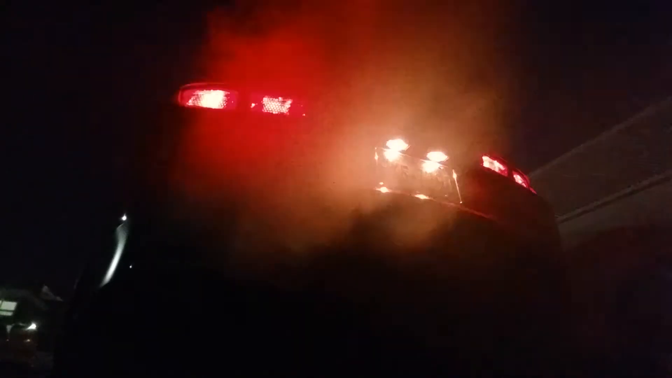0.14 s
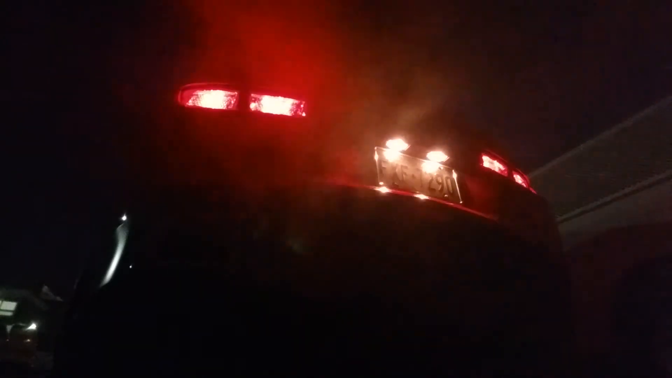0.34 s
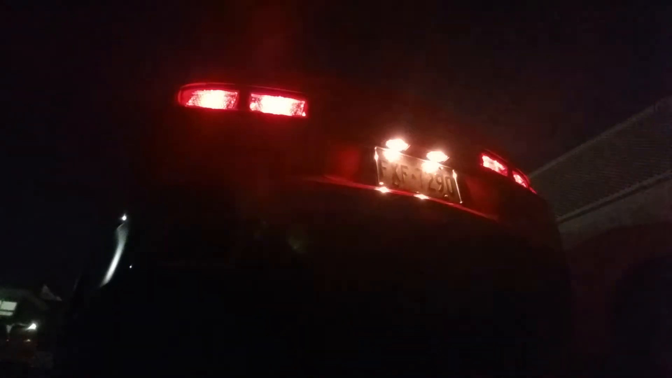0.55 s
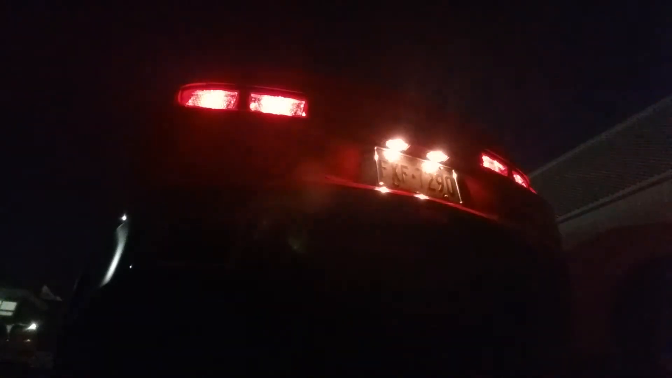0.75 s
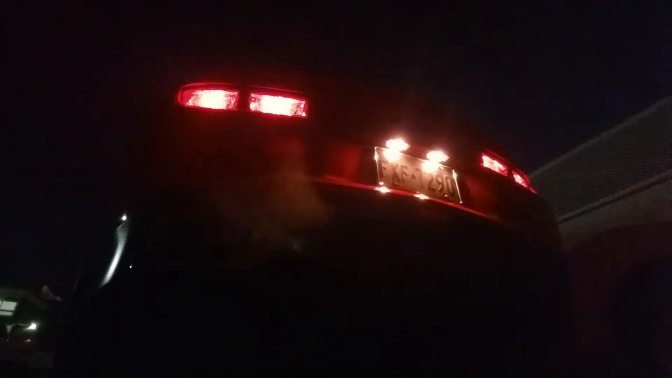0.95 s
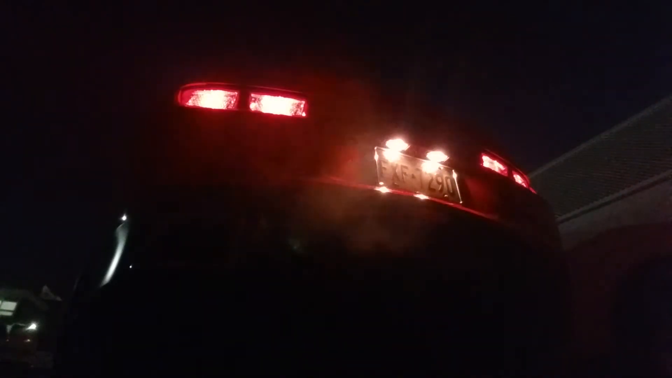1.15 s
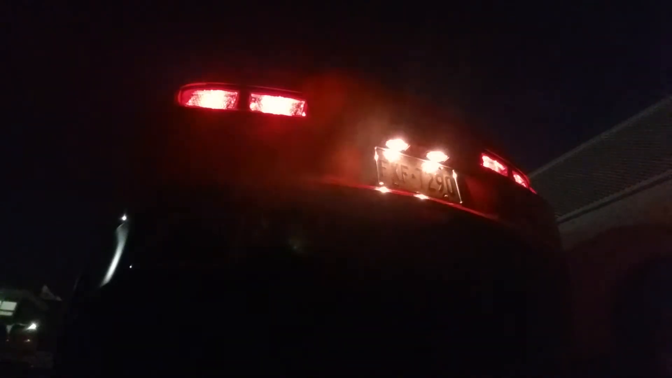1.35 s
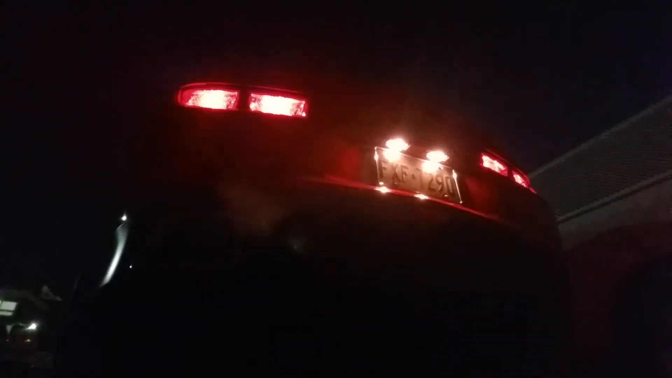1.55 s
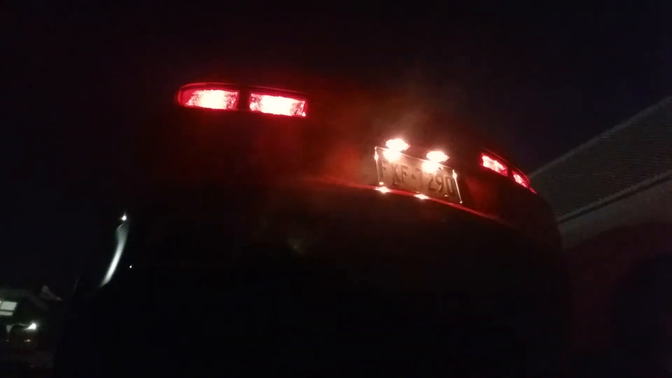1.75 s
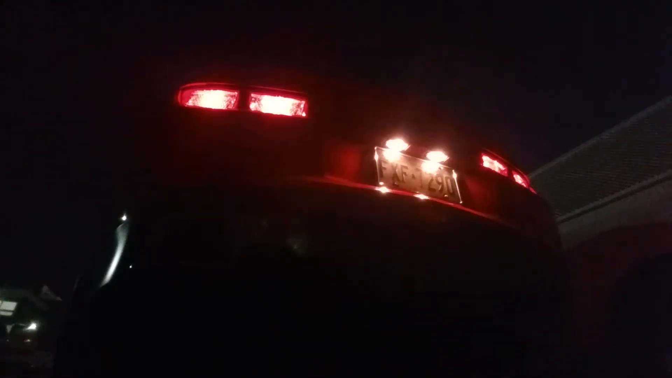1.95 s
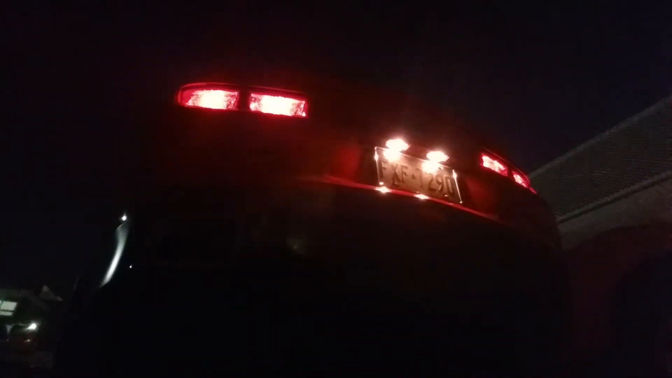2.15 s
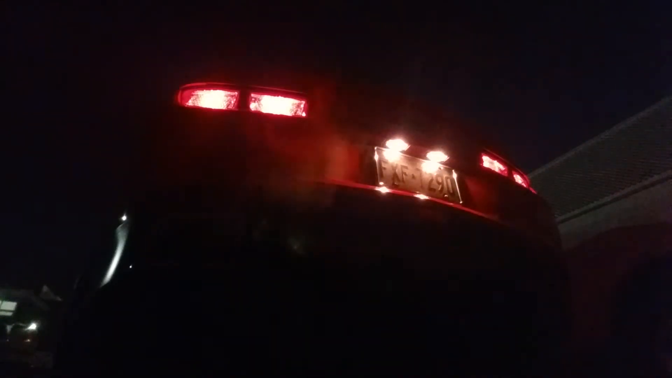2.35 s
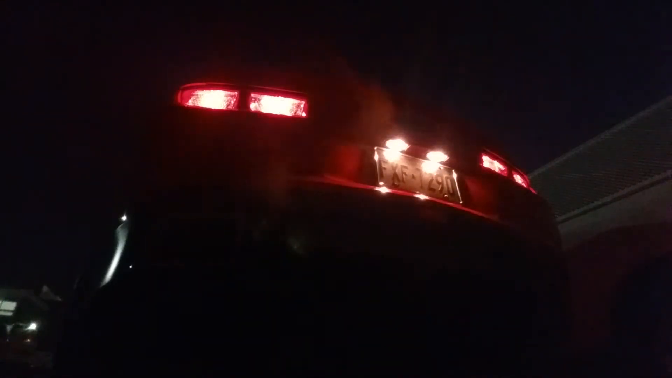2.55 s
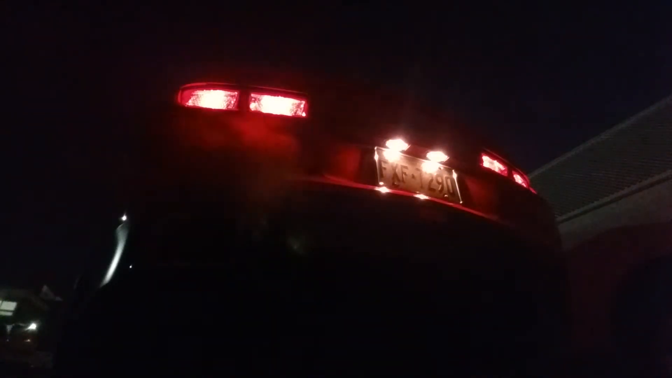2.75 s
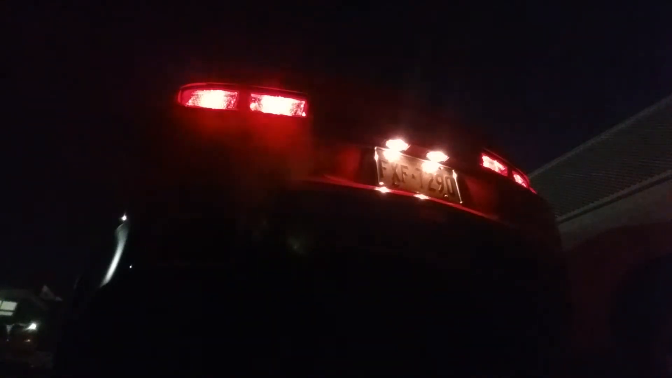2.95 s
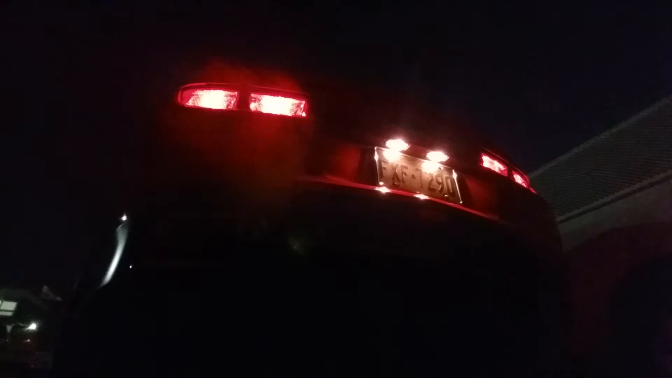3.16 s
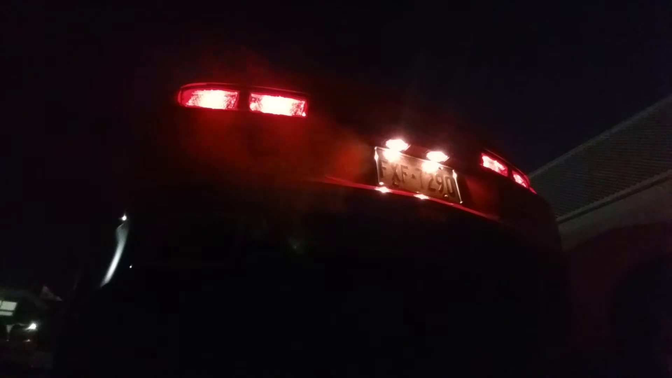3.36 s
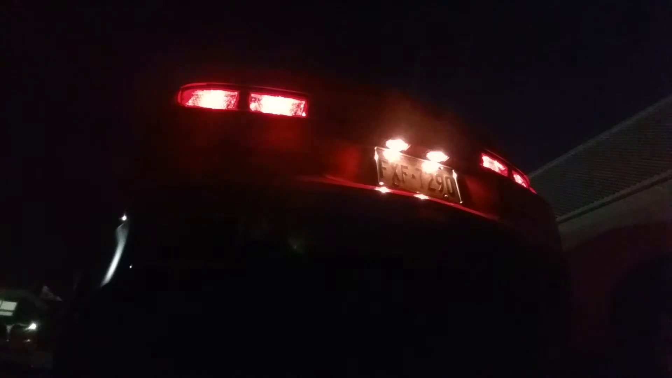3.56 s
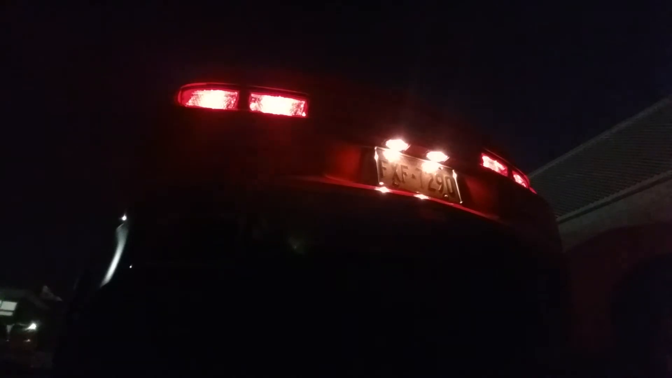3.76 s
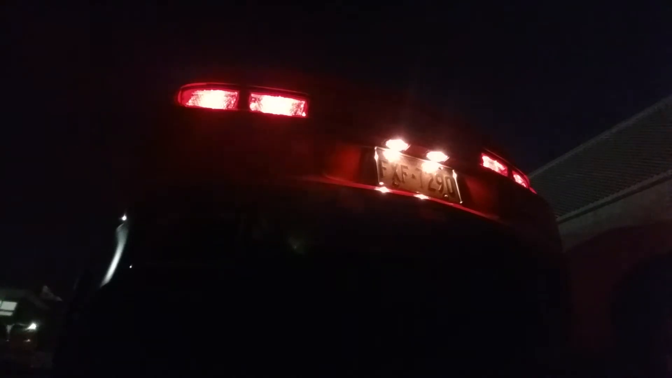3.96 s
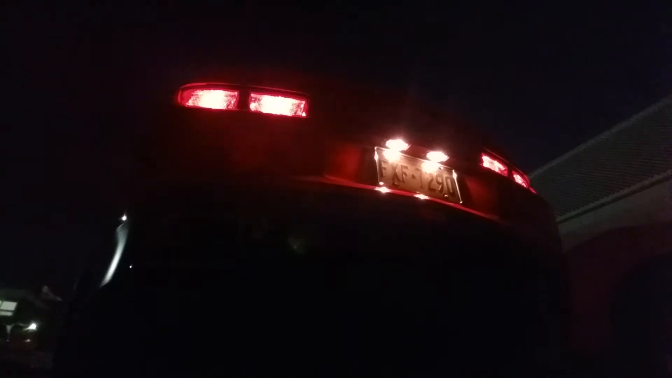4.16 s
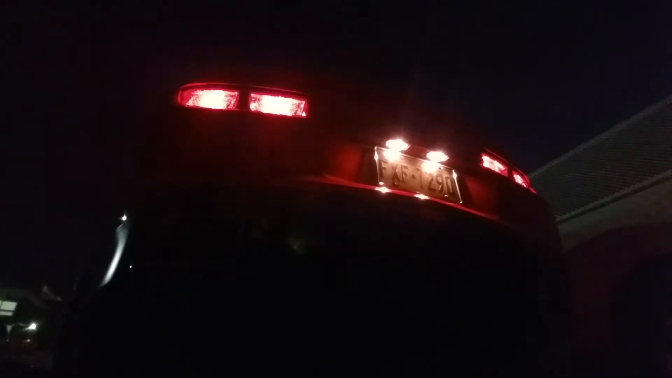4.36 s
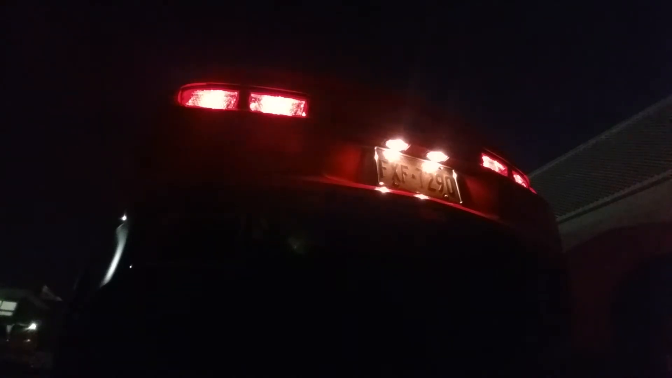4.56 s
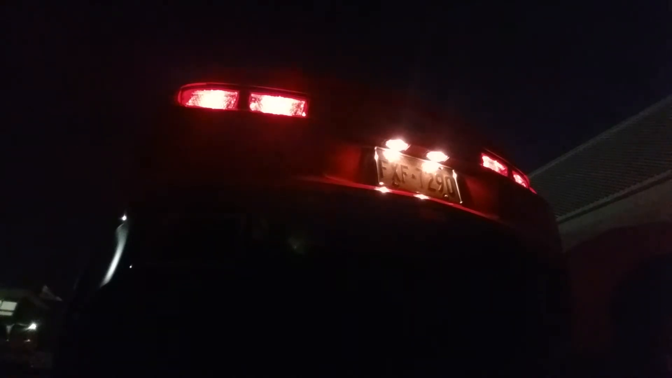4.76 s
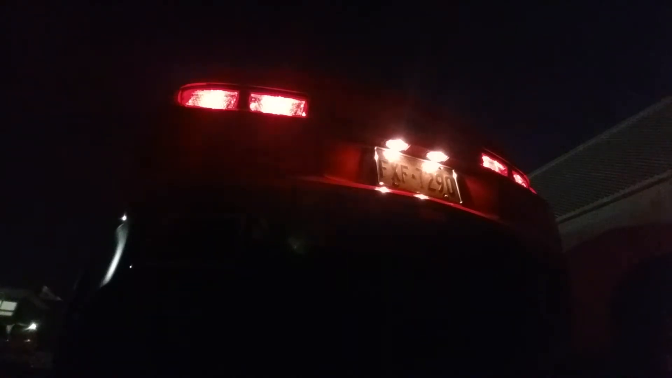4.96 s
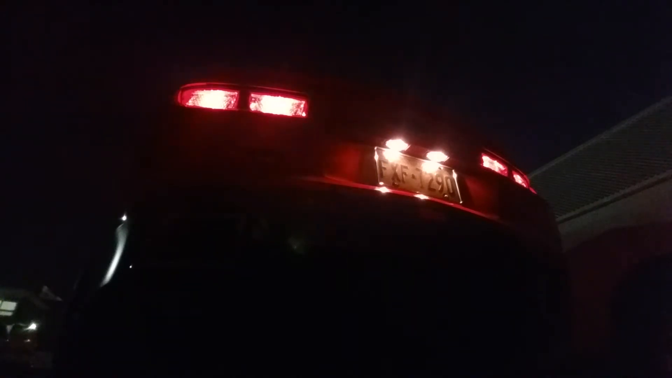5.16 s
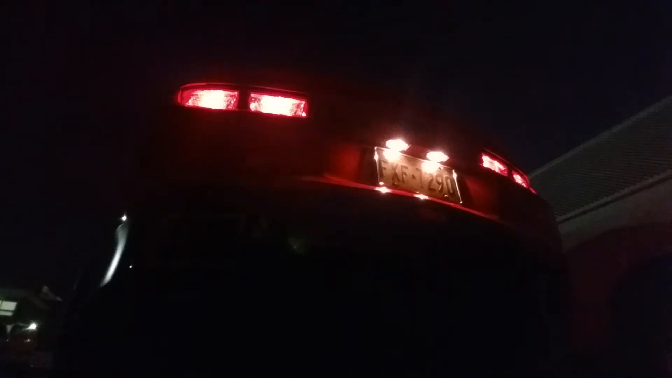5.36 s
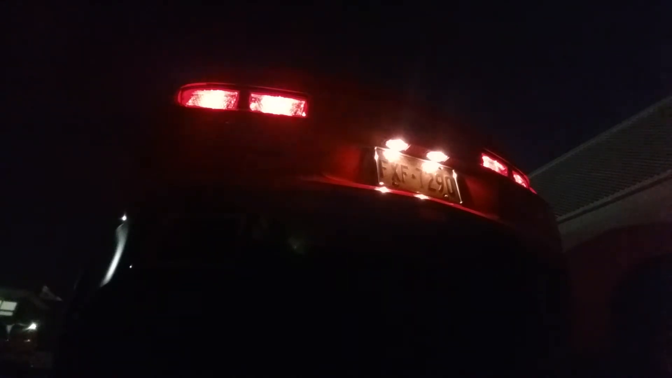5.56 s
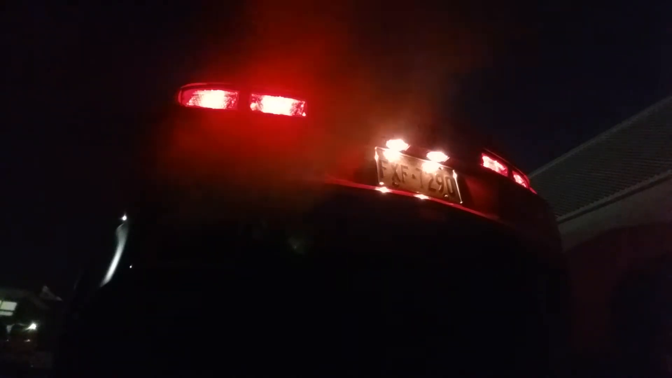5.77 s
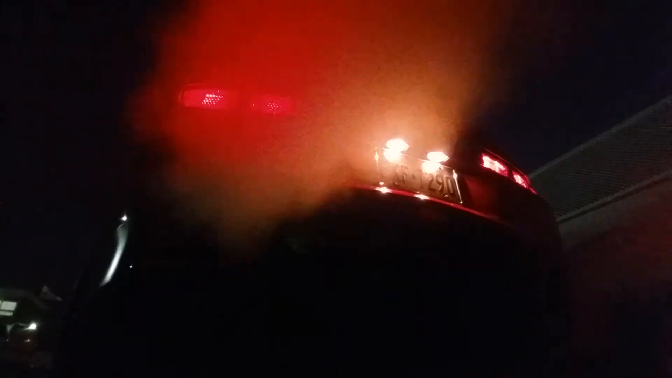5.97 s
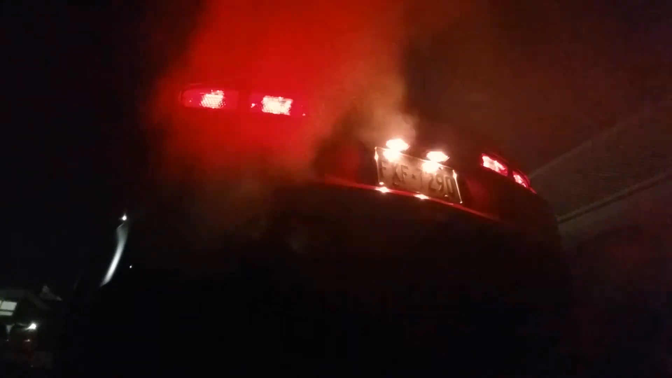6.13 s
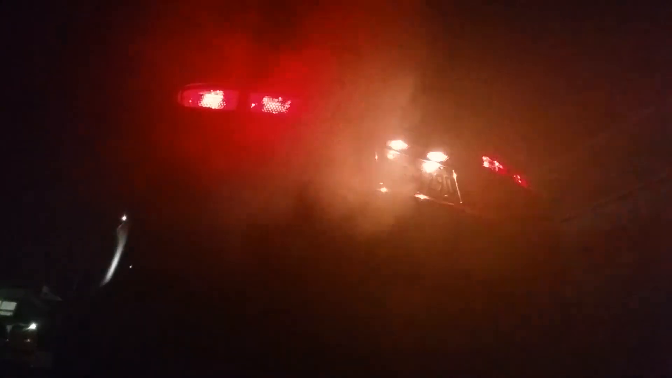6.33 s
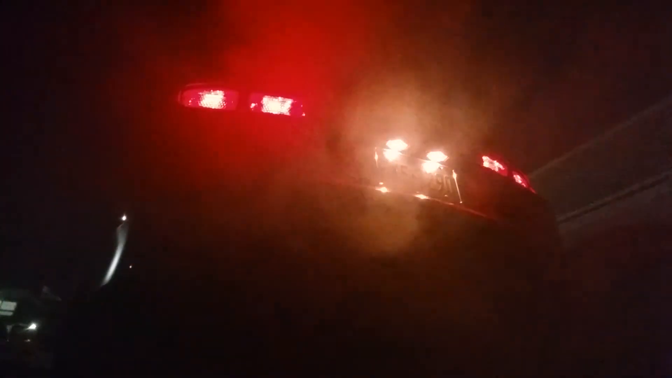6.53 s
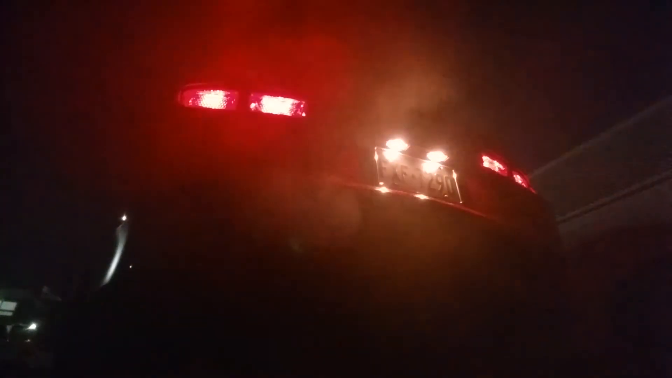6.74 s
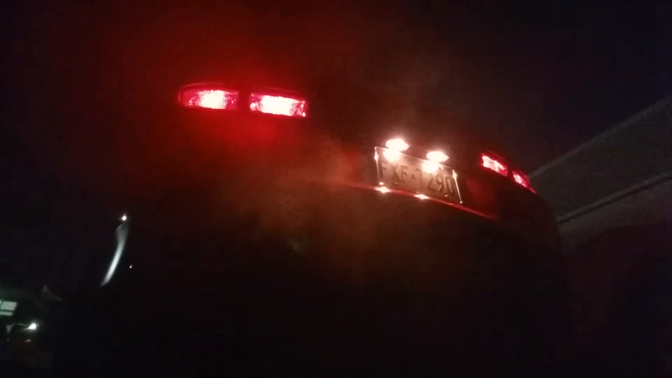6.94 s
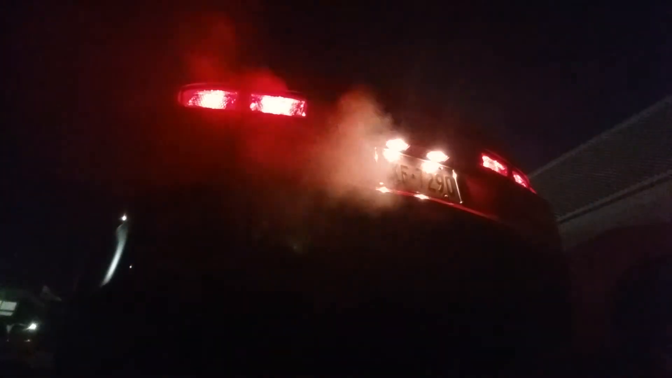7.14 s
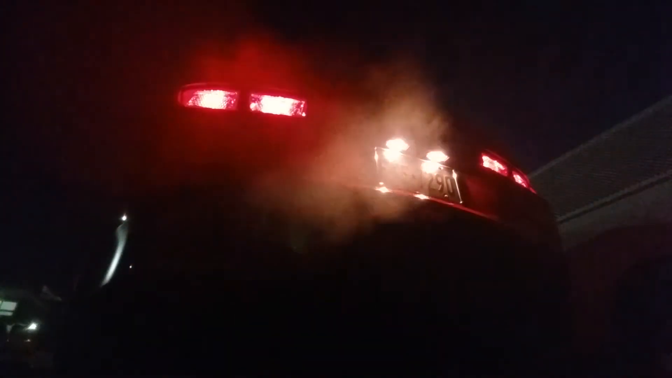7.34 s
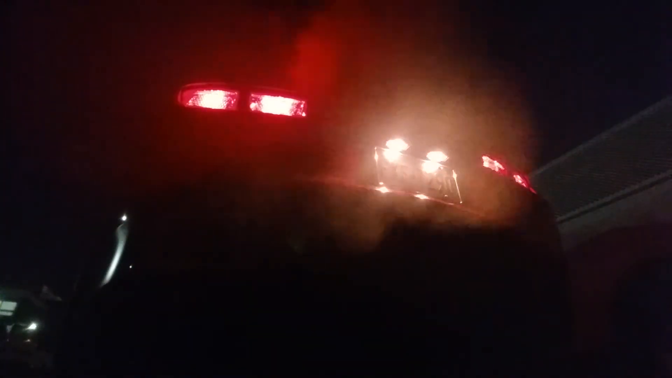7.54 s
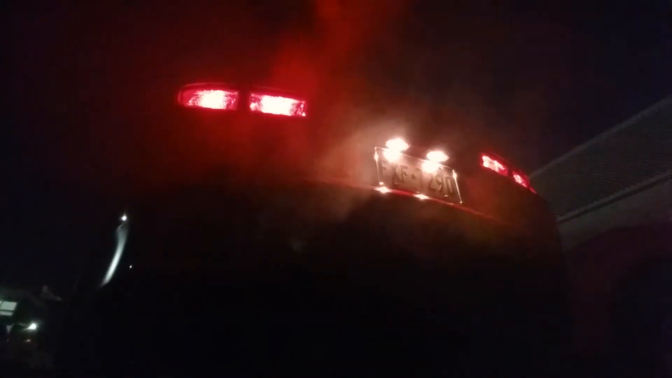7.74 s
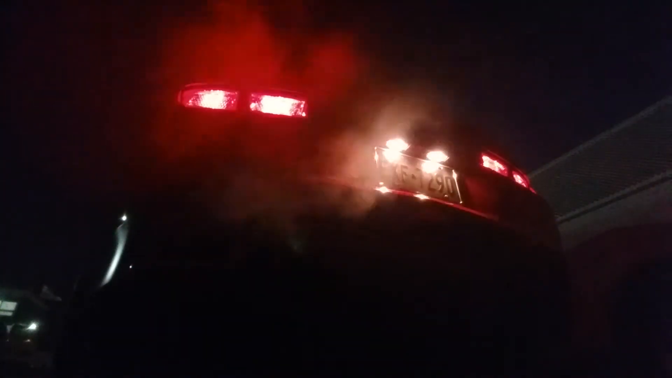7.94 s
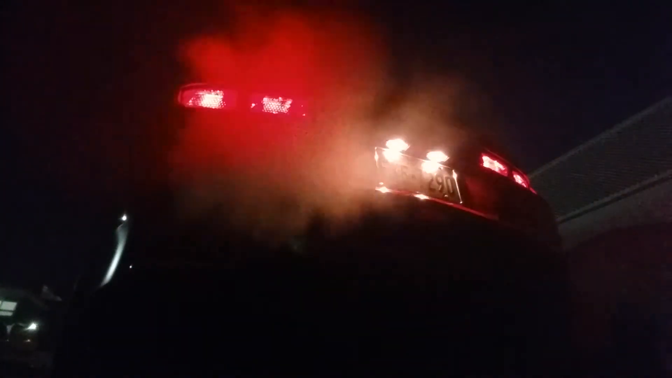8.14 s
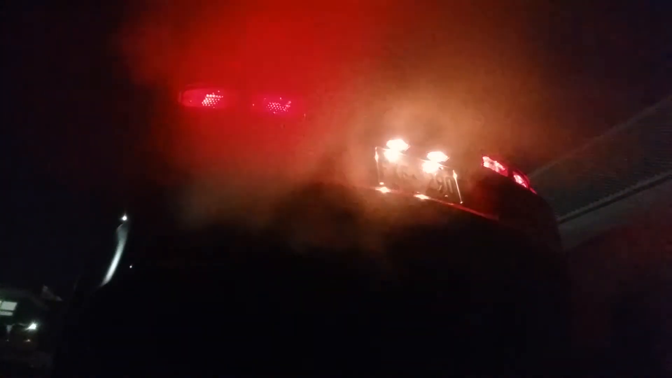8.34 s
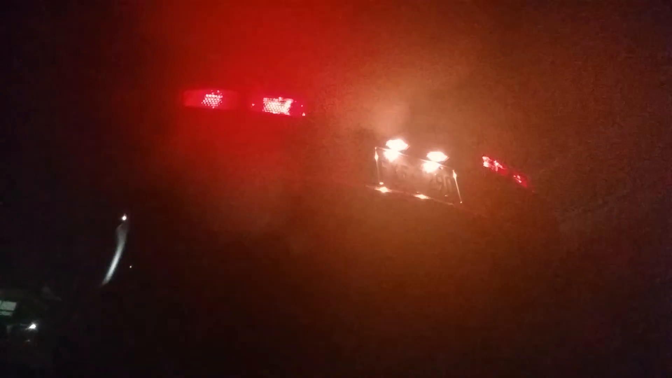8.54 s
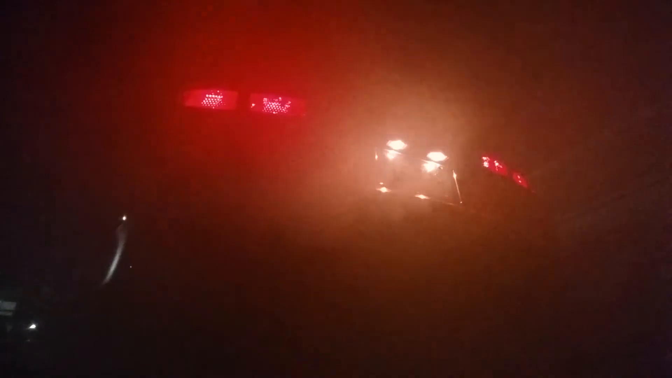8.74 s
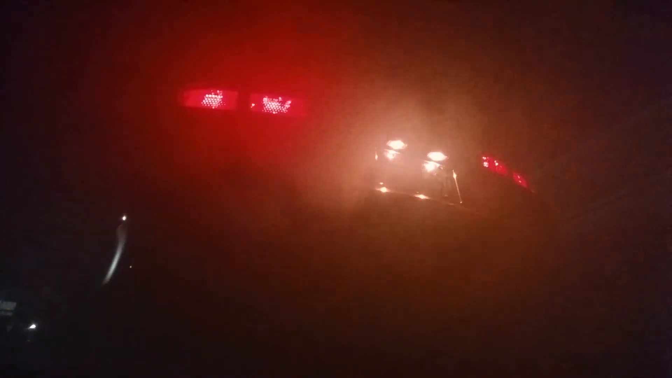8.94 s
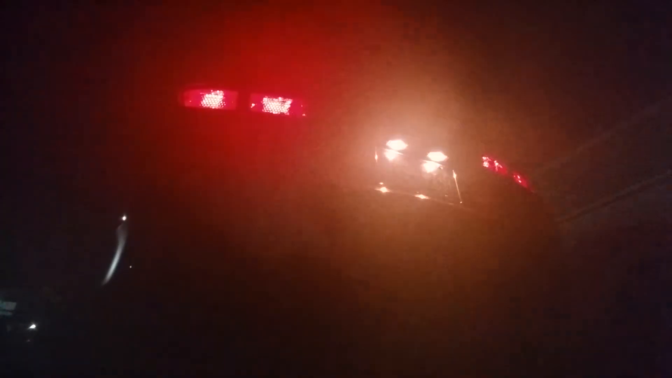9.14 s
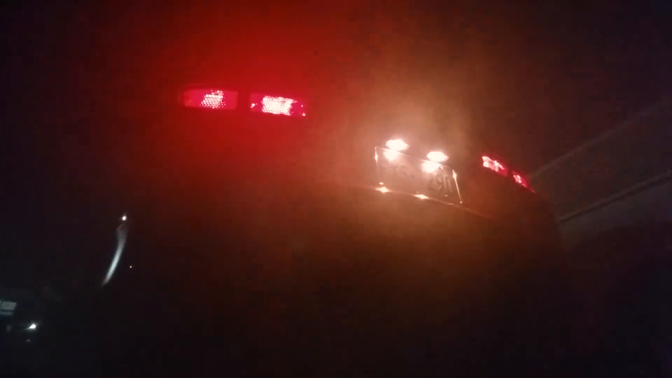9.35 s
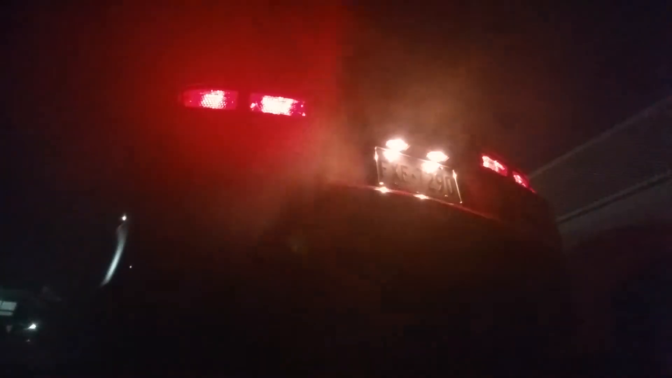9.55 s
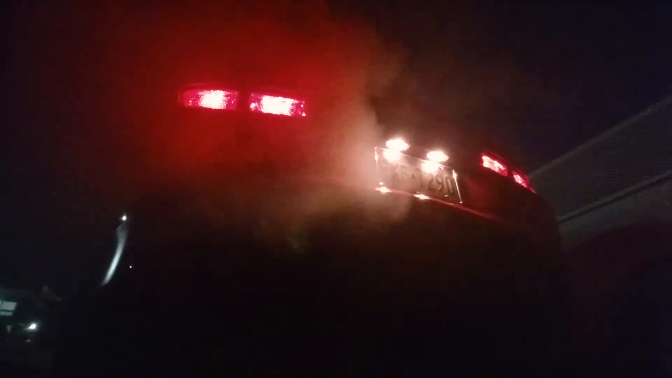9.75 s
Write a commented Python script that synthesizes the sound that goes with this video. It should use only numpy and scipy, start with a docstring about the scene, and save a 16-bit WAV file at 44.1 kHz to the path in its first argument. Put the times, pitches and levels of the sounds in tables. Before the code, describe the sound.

Loud V8 exhaust runs down popping into a slow uneven idle, then two violent revs bark, with sharp backfires between them.

```python
"""A cross-plane V8 with an open exhaust, outdoors, heard from a metre or two behind the car.
It runs down from a rev to a loping idle, is blipped hard twice and pops on the overrun.
Eight uneven cylinders ring the pipes; gas rasps and crackles after each firing; valves tick at idle.
Speed and throttle set the levels. Pops are pressure fronts with noise bursts; one faint squeak is filtered noise.
The ground, car and a wall scatter the sound; the microphone's limiter flattens the revs."""
import sys
import numpy as np
from scipy import signal
from scipy.fft import rfft, irfft
from scipy.io import wavfile
from scipy.ndimage import uniform_filter1d, minimum_filter1d

SR = 44100
rng = np.random.default_rng(int(sys.argv[2]) if len(sys.argv) > 2 else 0)


def wav_out(sig):
    """Save sig, one row per channel (or a flat mono array), as 16-bit PCM at SR to the path in sys.argv[1]."""
    wavfile.write(sys.argv[1], SR, np.round(np.clip(np.atleast_2d(sig).T, -1, 1) * 32767).astype(np.int16))


N = 432180
TIME = np.arange(N) / SR


def undb(db):
    """Decibels to gain."""
    return 10 ** (np.asarray(db) / 20)


def ramp(x):
    """Hold a share between 0 and 1."""
    return np.clip(x, 0, 1)


def even(x, size=7000):
    """Unit level over about one idling engine cycle; single beats stay."""
    return x / np.sqrt(uniform_filter1d(x.mean(axis=0) ** 2, size) + 1e-12)


def blend(a, b, share):
    """Cross from one sound to another at even power."""
    return np.sqrt(1 - share) * even(a) + np.sqrt(share) * even(b)


def over_frequency(table, size):
    """Table columns on the bins of a transform, joined on a log axis."""
    table_hz, *columns = np.transpose(table)
    bin_hz = np.arange(size // 2 + 1) * SR / size
    return [np.interp(np.log(bin_hz + 1), np.log(table_hz), c) for c in columns]


def ring(x, spectrum, size=16384):
    """Minimum-phase resonator with this spectrum, falling a further 20 dB per octave above its last point."""
    bin_hz = np.arange(size // 2 + 1) * SR / size
    octaves_above = np.log2(np.maximum(bin_hz / spectrum[-1][0], 1))
    level_db = over_frequency(spectrum, size)[0] - 20 * octaves_above
    # folding the cepstrum makes the response causal
    cepstrum = irfft(np.log(undb(level_db)))
    cepstrum[1:size // 2] *= 2
    cepstrum[size // 2 + 1:] = 0
    response = irfft(np.exp(rfft(cepstrum)))
    return signal.oaconvolve(np.atleast_2d(x), response[None], axes=1)[:, :N]


def pulses(times, db):
    """One impulse at each time, shared between two samples."""
    at = np.clip(times * SR, 0, N - 2)
    i, size = at.astype(int), undb(db)
    return np.bincount(i, size * (1 - at + i), N) + np.bincount(i + 1, size * (at - i), N)


def puffs(kicks, decay_s, steady=0., channels=2):
    """Noise that flares at each kick and dies away, over a steady share."""
    flare = signal.lfilter([1], [1, -np.exp(-1 / (decay_s * SR))], kicks)
    envelope = flare + steady * uniform_filter1d(flare, SR // 20)
    return envelope * rng.standard_normal((channels, N))


# the car's body and the ground colour the two ports: freq_hz, left_lead_rad, left_minus_right_db
PORTS = [(60, 0, -.6), (200, 0, 0), (400, .15, -.3), (700, 1.2, 4.6), (1050, 2.0, 4.2), (2500, 2.3, .5)]


def ports(x):
    """Phase and level differences between left and right."""
    lead_rad, tilt_db = over_frequency(PORTS, N)
    half = np.exp(.5j * lead_rad) * undb(tilt_db / 2)
    return irfft(rfft(x) * np.array([half, 1 / half]), N)


# round trips in the silencer's chambers: lag_s, reflected_share
CHAMBERS = [(.0029, 0.44), (.0053, 0.68), (.0081, 0.69)]


def silencer(x):
    """All-pass chambers pass every frequency but smear each pulse into a train of echoes."""
    spectrum, hz = rfft(x), np.arange(N // 2 + 1) * SR / N
    for lag_s, share in CHAMBERS:
        trip, back = np.exp(-2j * np.pi * hz * lag_s), min(share, .8)
        spectrum = spectrum * (trip - back) / (1 - back * trip)
    return irfft(spectrum, N)


def yard(x, wet_db, decay_s, above_hz):
    """Scatter from ground, car and a wall, different at each port; the longest waves pass it by."""
    t = TIME[:SR // 3]
    tail = rng.standard_normal((2, len(t))) * np.exp(-t / decay_s)
    highpass = signal.butter(2, above_hz, "highpass", fs=SR, output="sos")
    tail = signal.sosfilt(highpass, tail)
    tail /= np.sqrt(np.sum(tail ** 2, axis=1, keepdims=True))
    return x + undb(wet_db) * signal.oaconvolve(x * np.ones((2, 1)), tail, axes=1)[:, :N]


# squeak spectrum: freq_hz, level_db
SQUEAK = [(1600, -28), (1900, -12), (1970, -13), (2060, -31), (2400, -19)]
SQUEAK_AT_S, SQUEAK_LENGTH_S, SQUEAK_DB = 7.62, 0.37, -41


def squeak():
    """Narrow-band noise makes an unsteady tone that swells and fades."""
    swell = np.sin(np.pi * ramp((TIME - SQUEAK_AT_S) / SQUEAK_LENGTH_S))
    return undb(SQUEAK_DB) * swell * even(ring(rng.standard_normal(N), SQUEAK))


# unburnt fuel going off in the pipe: start_s, rasp_peak_db, crackle_db
POPS = [(0.605, -9, -35), (0.686, -9.5, -15.5), (0.7343, -14, -15), (0.856, -16, -21), (0.901, -13.5, -19),
        (0.9416, -5.5, -29), (1.003, -18.5, -54), (1.052, -14, -67), (1.1125, -12.5, -48),
        (1.127, -23.5, -56), (1.163, -20, -56), (1.212, -21, -57), (1.2485, -21, -57), (1.266, -25, -56),
        (1.3137, -21, -53), (1.3764, -27, -45), (1.5824, -15.5, -58), (1.613, -21.5, -64),
        (5.743, -24.5, -48), (5.768, -5.5, -37), (5.824, 0, -23), (5.858, 2, -11.5), (6.937, -17, -18),
        (6.978, -11.5, -20.5), (7.091, -4, -18), (7.175, -1, -54), (7.315, -6.5, -69), (7.387, -5, -47),
        (7.411, -10.5, -34), (7.443, -9.5, -45), (7.472, -11.5, -54), (7.514, -39, -56), (7.58, -22, -53),
        (7.6036, -13.5, -52), (7.643, 2.5, -19.5), (7.7417, -20, -55), (8.202, -14.5, -59),
        (9.475, -14, -22.5), (9.6363, -8.5, -38), (9.6778, -17, -52), (9.772, -28, -48)]


def misfires():
    """Exhaust gain: it sags just before each pop, while a charge goes through unburnt."""
    lead_s, width_s, sag_db = .011, .012, -4.5
    sag = 0
    for start_s, _, _ in POPS:
        offset = (TIME - start_s + lead_s) / width_s
        sag = sag + np.exp(-np.minimum(offset ** 2, 20))
    return undb(sag_db * sag)


# pressure front of a pop: freq_hz, level_db
SLAP = [(80, -22), (250, -4), (400, 0), (750, -1), (1050, -7), (1500, -4), (2000, -9), (5000, -36)]
# turbulent gas at the tips: freq_hz, level_db
RASP = [(60, -53), (500, -18), (1000, 7), (1230, 2), (1530, 5), (1850, 1.5), (2080, -0.5), (2350, -0.5),
        (2600, -6.5), (3400, -9), (4000, -14.5), (5500, -21.5), (8000, -29), (16000, -55.5)]
# tearing gas: freq_hz, level_db
CRACKLE = [(60, -25), (500, 2.5), (1500, 7.5), (3200, 9), (4600, -0.5), (6200, 0.5), (7600, -7),
           (9500, -4.5), (12000, -1.5), (16000, -6.5)]
# tailpipe under pressure: freq_hz, level_db
BARK_REV = [(40, -53), (100, -28), (205, -6.5), (260, -9.5), (330, 0.5), (385, 4), (450, -2), (520, 2),
            (580, 0), (690, 1), (820, -2), (960, -9.5), (1150, -19.5), (2500, -45)]
SLAP_DB = 26.5
POP_DECAY_S, POP_DOUBLING_DB = 0.02, 11.5  # decay of a 0 dB pop; rise that doubles it


def pops():
    """Afterfire: a sharp pressure front and a decaying gas burst that makes the tailpipe bark."""
    rasp, crackle = np.zeros((2, N))
    for start_s, rasp_db, crackle_db in POPS:
        start = int(start_s * SR)
        decay_s = POP_DECAY_S * 2 ** (rasp_db / POP_DOUBLING_DB)
        burst = np.exp(-TIME[:min(N - start, SR // 4)] / max(decay_s, .002))
        rasp[start:start + len(burst)] += undb(rasp_db) * burst
        crackle[start:start + len(burst)] += undb(crackle_db) * burst
    noise = rng.standard_normal((3, 2, N))
    bark = ports(ring(rasp * noise[2, 0], BARK_REV))
    fronts = pulses(np.array(POPS)[:, 0], SLAP_DB)
    slap = ports(ring(fronts + .5 * silencer(fronts), SLAP))
    gas = undb(6.5) * ring(crackle * noise[0], CRACKLE) + undb(-0.5) * ring(rasp * noise[1], RASP)
    return slap + gas + undb(22.5) * bark


# throttle-shut speed held by the idle control: time_s, firing_rate_hz
IDLE = [(1.5, 113), (1.8, 97), (2.05, 89), (2.3, 75), (2.55, 65), (3.3, 56.4), (3.9, 50), (4.5, 51.7),
        (5.1, 49.3), (5.7, 50.6), (8, 92), (8.2, 112)]
# throttle blips: open_s, pedal_travel_s, run_up_s, coast_s, top_firing_rate_hz,
# then after lift-off: boom_change_db, bark_change_db, howl_share (0-1)
REVS = [(-.42, .05, 0.396, .29, 269, 2, 3, 0), (5.66, 0.13, .47, 6.41, 284.6, -2.5, 0, 0.04),
        (8.185, 0.067, .32, 8.88, 284.8, -17, -7, .9)]
RUN_UP_CURVE = 1.25  # slow pick-up at first
DROOP_HZ_PER_S = 35  # slow fall in speed after lift-off, before the faster coast
COAST_HZ_PER_S, COAST_EASE_S, FLYWHEEL_S = 143, 4.2, 0.201  # friction, easing as it runs down
LIFT_S, LIFT_LAG_S = 0.05, 0.023
COLOUR_ABOVE_HZ, COLOUR_SPAN_HZ, COLOUR_S = 157.5, 33.6, 0.04  # each blip's own colour at high speed
FEATHER_BOOM_DB, FEATHER_BARK_DB, FEATHER_HZ_PER_S = 3, 6, 170.3  # touch of pedal as the idle climbs


def driver():
    """Speed, throttle, lift-off, colour, howl: blips spin the engine up, friction runs it down."""
    idle_hz = np.interp(TIME, *np.transpose(IDLE))
    hz, throttle, lift, howl = idle_hz, 0, 0, 0
    feather = ramp(np.gradient(idle_hz) * SR / FEATHER_HZ_PER_S) ** 2
    colour_db = np.outer([FEATHER_BOOM_DB, FEATHER_BARK_DB], feather)
    for open_s, pedal_s, run_up_s, coast_s, top_hz, boom_db, bark_db, howl_share in REVS:
        run_up = ramp((TIME - open_s) / run_up_s)
        since_lift_s = TIME - open_s - run_up_s
        coasting_s = np.maximum(TIME - coast_s, 0)
        lost_hz = COAST_HZ_PER_S * COAST_EASE_S * (1 - np.exp(-coasting_s / COAST_EASE_S))
        droop_hz = DROOP_HZ_PER_S * np.clip(since_lift_s, 0, coast_s - open_s - run_up_s)
        free_hz = top_hz - droop_hz - uniform_filter1d(lost_hz, int(FLYWHEEL_S * SR))
        rev_hz = idle_hz + (free_hz - idle_hz) * np.sin(np.pi / 2 * run_up ** RUN_UP_CURVE) ** 2
        hz = np.maximum(hz, rev_hz)
        throttle = throttle + ramp((TIME - open_s) / pedal_s) * ramp(1.7 * (1 - run_up))
        lift = lift + np.exp(-np.minimum(((since_lift_s - LIFT_LAG_S) / LIFT_S) ** 2, 20))
        flying = ramp(.5 + since_lift_s / COLOUR_S) * ramp((rev_hz - COLOUR_ABOVE_HZ) / COLOUR_SPAN_HZ)
        colour_db = colour_db + np.outer([boom_db, bark_db], flying)
        howl = howl + howl_share * flying
    return hz, throttle, lift, colour_db, howl


# exhaust with the throttle shut: firing_rate_hz, boom_db, bark_db, rasp_db, crackle_db
BY_SPEED = [(51.3, -13, -18, -37.5, -53.5), (55.2, -12, -20, -42.5, -57.5), (64.3, -18, -21, -49, -69),
            (100.6, -16.5, -17, -43, -64), (118.6, -15, -12.5, -37.5, -55.5),
            (171.6, -13.5, -6.5, -22, -49), (196.7, -14.5, -1.5, -14, -29), (209, -11, -1.5, -14.5, -29),
            (237.2, -26, -4.5, -12, -20), (273, -21.5, -5.5, -14, -22.5)]
OPEN_BOOM_DB, OPEN_BARK_DB, OPEN_RASP_DB, OPEN_CRACKLE_DB = 9, 14, 24, 25.5  # added by open throttle
LIFT_BARK_DB, LIFT_GAS_DB = -4, 4.5  # as the throttle snaps shut
GAS_FOLLOWS_BARK = 0.52  # share of the bark's colour that reaches rasp and crackle


def effort(hz, throttle, lift, colour_db):
    """Layer levels: set by speed, raised by throttle; at lift-off the bark sags and the gas swells."""
    speeds_hz, *columns = np.transpose(BY_SPEED)
    boom_db, bark_db, rasp_db, crackle_db = (np.interp(hz, speeds_hz, c) for c in columns)
    gas_db = LIFT_GAS_DB * lift + GAS_FOLLOWS_BARK * colour_db[1]
    return (boom_db + OPEN_BOOM_DB * throttle + colour_db[0],
            bark_db + OPEN_BARK_DB * throttle + LIFT_BARK_DB * lift + colour_db[1],
            rasp_db + OPEN_RASP_DB * throttle + gas_db,
            crackle_db + OPEN_CRACKLE_DB * throttle + gas_db)


# cylinders in firing order: pulse_db, manifold_delay_s, rasp_db, valve_tick_db
CYLINDERS = [(1.6, -.0004, -6, 3), (-.9, -.0006, 6, -6), (3.1, .0001, -6, 4), (2.9, -.0001, -6, -1),
             (-2.1, .0019, -2, -6), (.9, -.0021, -4, 4), (-2.1, .0004, 8, -2), (-3.4, .0005, -1, -10)]
CYCLE_START_S = 4.361
SKEW_S, JITTER_S = .0007, .00019  # at speed every other pulse comes late, and all scatter


def firings(hz):
    """Running count, times and cylinder numbers; the manifolds bring firings to the tips unevenly."""
    count = np.cumsum(hz) / SR
    count -= np.interp(CYCLE_START_S, TIME, count)
    k = np.arange(np.ceil(count[0]), count[-1]).astype(int)
    number = k % len(CYLINDERS)
    delay_s = np.array(CYLINDERS)[number, 1]
    times = np.interp(k, count, TIME) + delay_s
    fast = ramp((np.interp(times, TIME, hz) - 92) / 65)
    jitter_s = JITTER_S * np.maximum(fast, .4) * rng.standard_normal(len(k))
    # speed shrinks the manifold delays
    return count, times + jitter_s + fast * (SKEW_S * (k % 2) - .35 * delay_s), number


# valve gear: freq_hz, level_db
VALVES = [(800, -3), (2000, 11.5), (2500, 10.5), (3000, 11), (3400, 15), (4300, -4), (5100, -1),
          (5700, 7.5), (6600, 1), (8600, -8.5), (10000, -2), (11500, -6.5), (13000, -3.5), (16000, -12.5)]
# loose metal that buzzes once a cycle: freq_hz, level_db
BUZZ = [(1500, -51), (2900, -16), (3350, 15), (3550, -1), (3900, -18.5)]


def valve_gear(times, valve_db, shakes):
    """Noise bursts ring as valve ticks; one cylinder shakes a loose piece of metal."""
    valves = ring(puffs(pulses(times + .002, valve_db), decay_s=.01, steady=.5), VALVES)
    buzz = ring(puffs(shakes, decay_s=.028, steady=.1), BUZZ)
    return undb(9) * even(valves) + undb(2.5) * even(buzz)


# knock that starts each buzz: freq_hz, level_db
KNOCK = [(550, -18.5), (770, 4), (900, 12), (1000, -1.5), (1200, -56), (2800, -45), (3300, -8.5),
         (3800, -37)]
KNOCK_DB, KNOCK_BELOW_HZ, KNOCK_SPAN_HZ = -29, 57.3, 18


def metal_knock(shakes, hz):
    """The same shakes knock the metal, only at the slowest idle."""
    slow = ramp((KNOCK_BELOW_HZ - hz) / KNOCK_SPAN_HZ)
    return undb(KNOCK_DB) * slow * even(ring(puffs(shakes, decay_s=0.021), KNOCK))


# long pipes and silencer at idle: freq_hz, level_db
BOOM = [(25, -29), (40, -17), (50, 4), (60, 8), (70, -7), (84, 9), (98, 10), (113, -9), (140, -4),
        (165, -8), (195, -21), (240, -12), (300, -31), (500, -53)]
# same pipes under pressure: freq_hz, level_db
BOOM_REV = [(25, -24), (50, -12), (90, 1.5), (115, 4.5), (145, 5.5), (190, -4.5), (260, -6), (500, -44.5)]


def pipes_boom(kicks, count, hz, revving):
    """Pulses ring the long pipes; rising speed brings out the firing note itself."""
    rumble = kicks + 0.088 * puffs(kicks, decay_s=0.0063, steady=0.21, channels=1)
    rings = blend(ring(kicks, BOOM), ring(rumble, BOOM_REV), revving)
    rising = ramp(uniform_filter1d(np.gradient(hz) * SR, SR // 10) / 150)
    note_db = -8 + 10 * rising - 20 * ramp(hz / 110 - 1)
    return even(rings + undb(note_db) * np.cos(2 * np.pi * (count - .2)))


# idle tailpipe resonances: low_hz, high_hz, noise_share, strike_db (eight cylinders in firing order)
BURBLE = [(130, 230, .015, (-3, 2, 0, -5, -2, 5, -1, -3)), (290, 440, .008, (2, 4, 4, 5, 4, 0, 1, 4)),
          (450, 660, .035, (-1, 2, -2, 1, 3, -2, -2, 1)), (680, 1300, .02, (4, 0, -4, -1, -1, -3, 1, 3))]


def burble(times, number, burn_db):
    """Each cylinder favours its own resonances through the manifold, so idle gurgles once a cycle."""
    out = 0
    for low_hz, high_hz, noise_share, cylinder_db in BURBLE:
        kicks = pulses(times, np.array(cylinder_db)[number] + burn_db)
        strike = kicks + noise_share * puffs(kicks, decay_s=.01, steady=.15, channels=1)
        bandpass = signal.butter(2, [low_hz, high_hz], "bandpass", fs=SR, output="sos")
        out = out + signal.sosfilt(bandpass, strike)
    return out


# tailpipe off throttle: freq_hz, level_db
BARK_IDLE = [(110, -14), (165, -5.5), (220, -12.5), (270, -9.5), (320, -6), (350, 0), (375, 3.5),
             (412, -3.5), (480, -9), (515, -2.5), (555, -10.5), (750, -4), (860, -13.5), (1050, -30.5),
             (2000, -86)]
# tailpipe when it howls: freq_hz, level_db
BARK_HOWL = [(40, -62), (100, -49), (220, -26), (300, -13.5), (385, 1), (450, -8), (520, -5), (590, -0.5),
             (690, 3), (800, -1.5), (950, -6), (1150, -44), (2500, -47)]
EDDY_DB, EDDY_PRESSURE_DB, EDDY_THROTTLE_DB = -14, 12.5, 2  # turbulence against the pulses
EDDY_LEFT_DB = 5.5  # left minus right: the nearer tip is on the left


def tailpipe_bark(kicks, gurgle, pressure, throttle, howl):
    """Smeared pulses ring the tailpipe; eddies at the two tips reach the ports unrelated."""
    blast = kicks + .015 * puffs(kicks, decay_s=.004, steady=.3, channels=1)
    eddy_db = EDDY_DB + EDDY_PRESSURE_DB * pressure + EDDY_THROTTLE_DB * throttle
    eddies = undb(eddy_db) * even(puffs(kicks, decay_s=0.0052, steady=0.48))
    eddies = eddies * undb(np.array([[EDDY_LEFT_DB], [-EDDY_LEFT_DB]]) / 2)
    slack = even(ports(silencer(gurgle))) + eddies
    driven = even(ports(silencer(blast))) + eddies
    roar = blend(ring(driven, BARK_REV), ring(driven, BARK_HOWL), ramp(howl))
    return even(blend(ring(slack, BARK_IDLE), roar, ramp(1.13 * pressure + 0.71 * throttle)))


def gas_rasp(times, pulse_db, gas_db, burn, gust, revving):
    """Gas leaves in soft puffs at idle, in short spits with the strong burns at speed."""
    soft = puffs(pulses(times, gas_db + 2 * gust), decay_s=0.013, steady=1.0)
    spits = puffs(pulses(times, .7 * gas_db + 2.5 * burn), decay_s=.003, steady=.45)
    gas = blend(soft, spits, revving)
    # at speed the pulse fronts' overtones run up into the rasp
    fronts = even(ports(silencer(pulses(times, pulse_db + burn))))
    return even(ring(gas + undb(-3.0) * revving * fronts, RASP))


def gas_crackle(times, gas_db, gust, spit):
    """Widely scattered puff strengths: the hardest stand out as crackle."""
    kicks = pulses(times, .4 * gas_db + 2.2 * gust + 3.5 * spit)
    return ring(puffs(kicks, decay_s=0.0066, steady=0.55), CRACKLE)


BURN_IDLE_DB, BURN_RAGGED_DB = 1.8, 2.4  # firing scatter at idle; extra above it
BURBLE_SCATTER_DB = 1.2


def engine():
    """Each firing booms in the pipes, barks in the tailpipe and throws out a puff of gas."""
    hz, throttle, lift, colour_db, howl = driver()
    boom_db, bark_db, rasp_db, crackle_db = effort(hz, throttle, lift, colour_db)
    count, times, number = firings(hz)
    pulse_db, _, gas_db, valve_db = np.array(CYLINDERS)[number].T
    burn, gust, spit = rng.standard_normal((len(times), 3)).T
    pressure = ramp((hz - 100) / 165)
    revving = ramp((hz - 92) / 65)
    # combustion is steadier at idle, ragged above it
    ragged = np.interp(times, TIME, ramp((hz - 70) / 50))
    kicks = pulses(times, pulse_db + burn * (BURN_IDLE_DB + BURN_RAGGED_DB * ragged))
    shakes = pulses(times[number == 0], 0)

    rasp = gas_rasp(times, pulse_db, gas_db, burn, gust, revving)
    crackle = gas_crackle(times, gas_db, gust, spit)
    gear = valve_gear(times, valve_db + 2 * spit, shakes)
    treble = np.sqrt(revving) * undb(4.0) * even(crackle) + np.sqrt(1 - revving) * gear
    gurgle = burble(times, number, BURBLE_SCATTER_DB * burn)

    boom = undb(boom_db + 0.74) * pipes_boom(kicks, count, hz, revving)
    bark = undb(bark_db + 0.35) * tailpipe_bark(kicks, gurgle, pressure, throttle, howl)
    gas = undb(rasp_db - 2.5) * rasp + undb(crackle_db) * treble
    return (boom + bark + metal_knock(shakes, hz) + gas) * undb(2.1 * pressure)


def scene():
    """Engine, afterfire and squeak, in the open."""
    exhaust = engine() * misfires()
    return yard(exhaust + pops() + squeak(), wet_db=-13.0, decay_s=.018, above_hz=33)


def limiter(x, ceiling, size=74):
    """Each channel is turned down for a few milliseconds around any peak over the ceiling."""
    gain = np.minimum(1, ceiling / (np.abs(x) + 1e-9))
    return x * uniform_filter1d(minimum_filter1d(gain, size, axis=1), size, axis=1)


TOP_HZ = 15900


def record(dry):
    """A fast limiter holds the peaks; the top is cut; both ends fade over 3 ms."""
    fade = ramp(np.minimum(TIME, TIME[-1] - TIME) / .003)
    lowpass = signal.ellip(10, .1, 70, TOP_HZ, fs=SR, output="sos")
    return fade * signal.sosfilt(lowpass, limiter(dry, ceiling=1.0))


dry = scene()
out = record(dry)
wav_out(out)
```